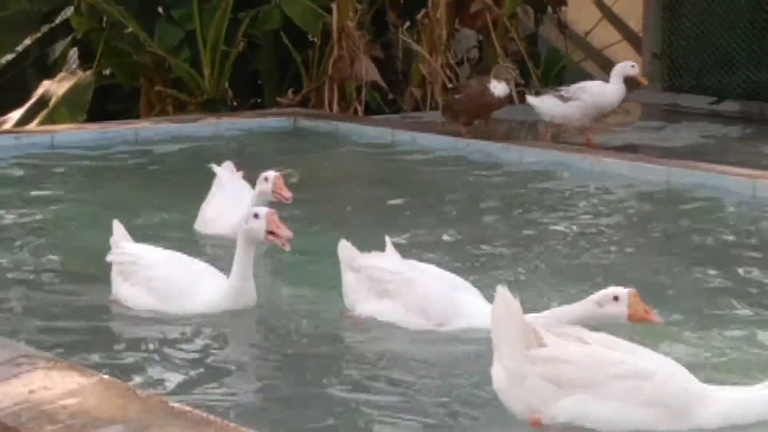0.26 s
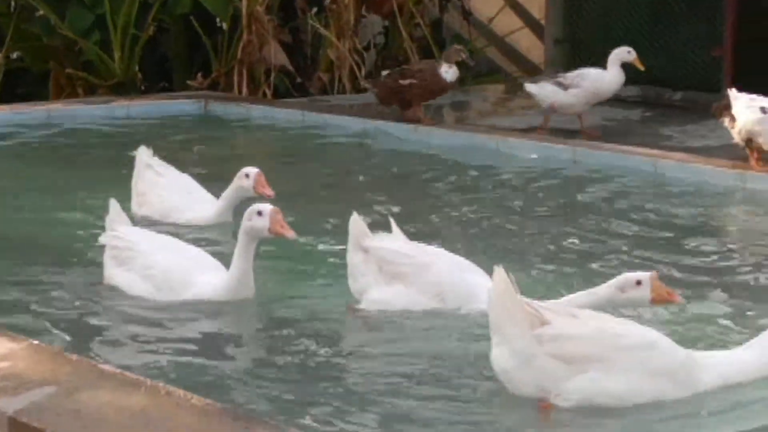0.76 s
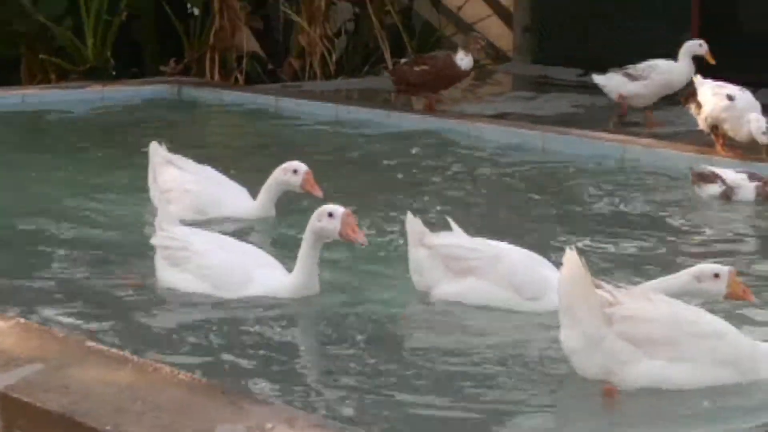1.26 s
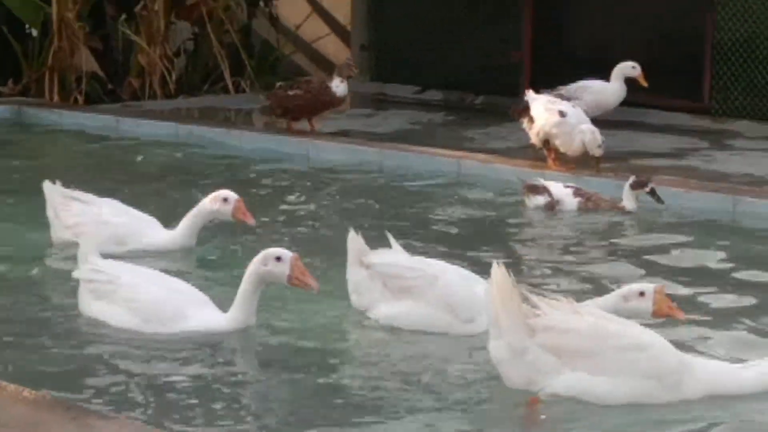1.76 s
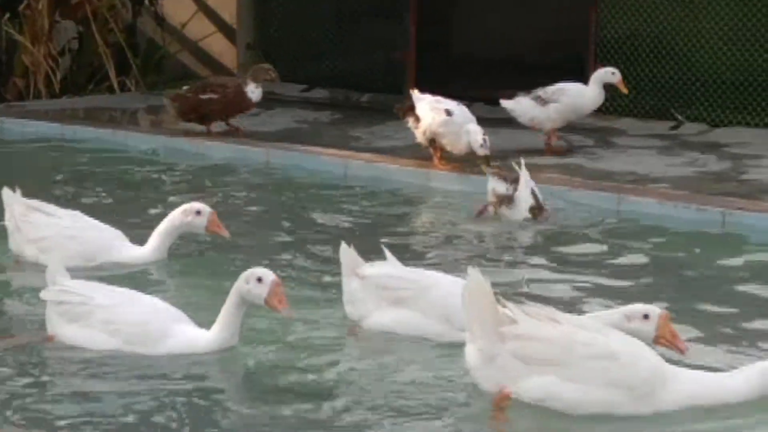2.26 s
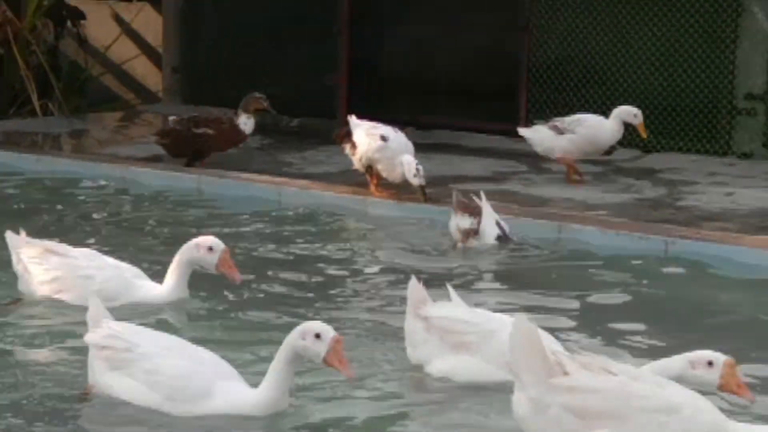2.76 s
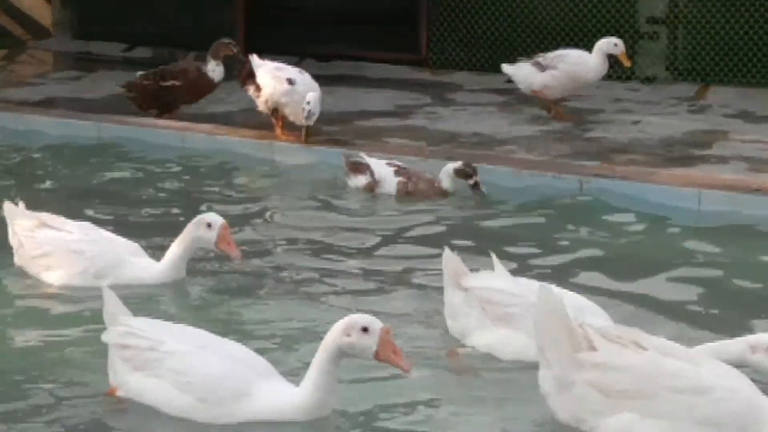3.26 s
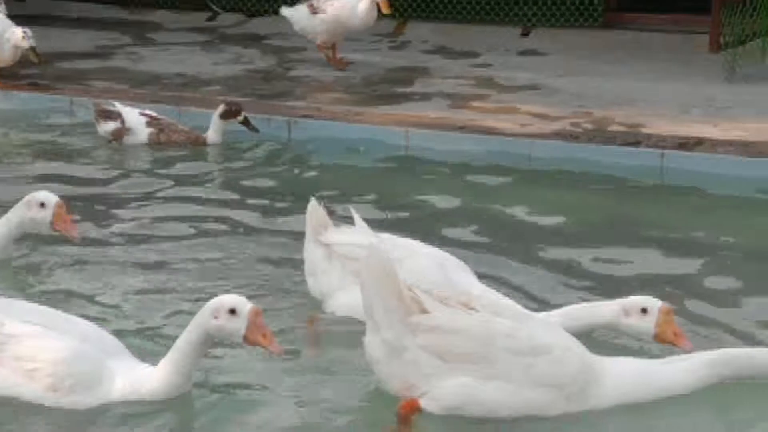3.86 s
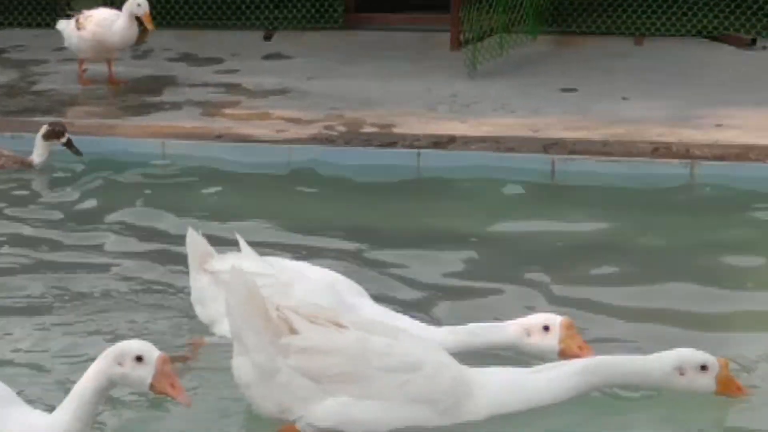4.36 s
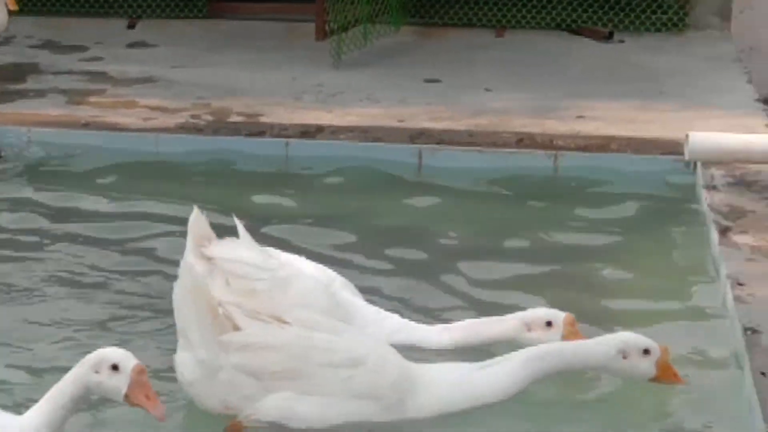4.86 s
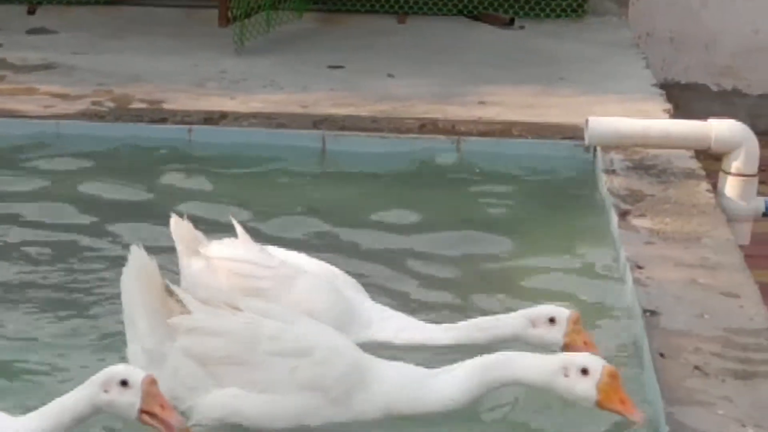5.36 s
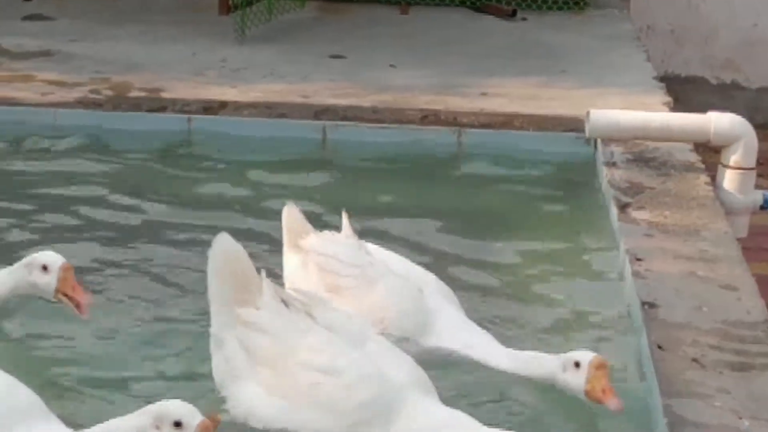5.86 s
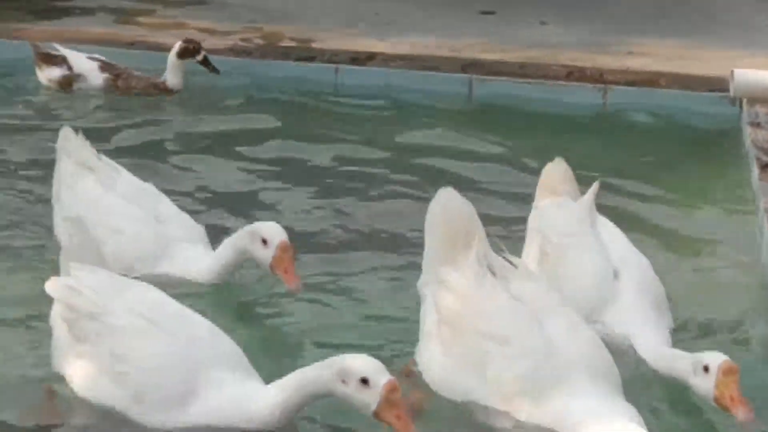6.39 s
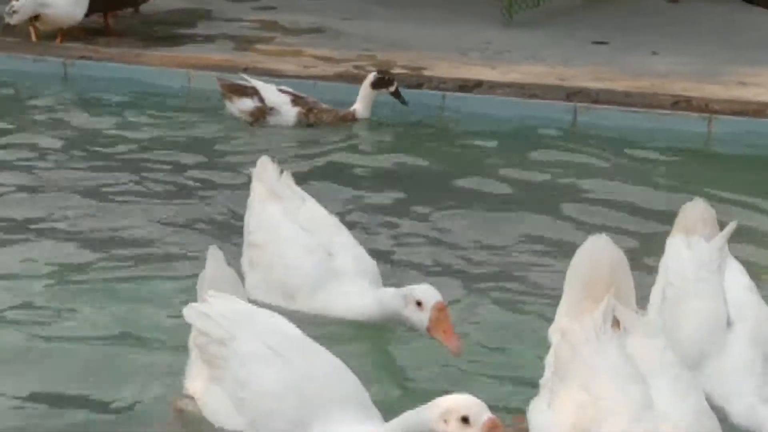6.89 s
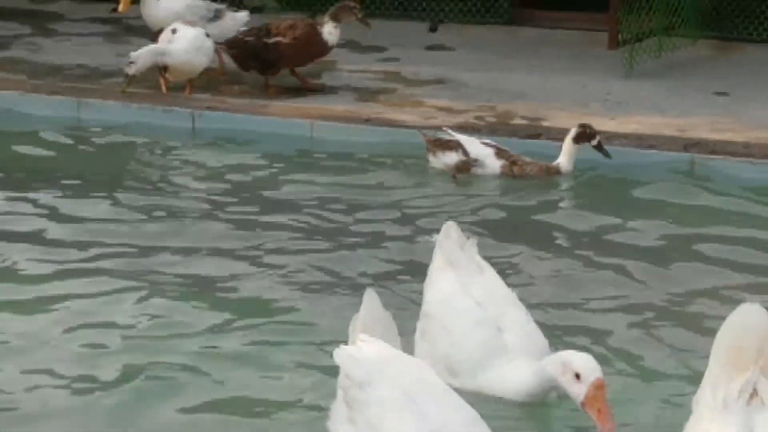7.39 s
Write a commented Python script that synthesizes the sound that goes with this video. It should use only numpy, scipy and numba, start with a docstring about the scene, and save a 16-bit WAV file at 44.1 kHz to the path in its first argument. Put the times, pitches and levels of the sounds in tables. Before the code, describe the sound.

Geese honk close by on an outdoor pond, their voices nasal and raspy, with a short echo from the enclosure's walls. Three quick honks open in the first half second, followed by a faint squeal and a few water drips until about 1.1 seconds. Farther birds give low buzzy brays around 1 and 2.3 seconds, with near honks between them. A small splash comes at 2.7 seconds, then more scattered honks. From about 4.2 to 6.2 seconds, honks, brays and high squeals overlap in a dense chorus, loudest near the end, where it slightly overloads the microphone. Two strong separate honks follow at about 6.7 and 7.2 seconds, and a harsh bray closes around 7.5. Underneath, a distant engine putters with a low rumble, speeding up and slowing down, along with faint wind and soft ripples.

```python
"""White geese honk close by on a pond, the loudest calls overloading the microphone.
Each honk is a buzz of slapping membranes, coloured by neck, throat and gaping bill. Birds farther
back bray, and some break into squeals. Water drips and splashes, and the enclosure's walls answer.
Outside, under a faint wind, a single-cylinder engine putters, speeding up and slowing down."""
import sys
import numpy as np
from scipy import signal
from scipy.fft import rfft, irfft, next_fast_len
from scipy.io import wavfile
from scipy.ndimage import uniform_filter1d, map_coordinates
from numba import njit

SR = 44100
rng = np.random.default_rng(int(sys.argv[2]) if len(sys.argv) > 2 else 0)


def to_wav(s):
    """Save 16-bit WAV."""
    ch = np.atleast_2d(s).T  # columns
    pcm = np.round(np.clip(ch, -1, 1) * 32767)  # PCM
    wavfile.write(sys.argv[1], SR, pcm.astype(np.int16))


N = 336483
TIME = np.arange(N) / SR


def amp(db):
    """Decibels to gain."""
    return 10 ** (np.asarray(db) / 20)


def unit(x):
    """x scaled to rms 1."""
    return x / np.sqrt(np.mean(x ** 2) + 1e-20)


def steady(x, size=700):
    """A leveller: holds x at rms 1 over a few pitch cycles."""
    power = uniform_filter1d(uniform_filter1d(x ** 2, size), size)
    return x / np.sqrt(np.abs(power) + 1e-12)


def along(points, hz):
    """Reads (f/Hz, value) points on a log frequency axis."""
    f, values = np.transpose(points)
    return np.interp(np.log(hz + 1), np.log(f + 1), values)


def curves(rows):
    """An automation curve for each column after t/s."""
    times, *columns = np.transpose(rows)
    return [np.interp(TIME, times, column) for column in columns]


def wobble(rate):
    """A smooth random curve, rate knots a second."""
    return map_coordinates(rng.standard_normal(int(N * rate / SR) + 4), [TIME * rate])


def colour(x, points, size=8192):
    """A minimum-phase EQ through (f/Hz, level/dB) points."""
    cepstrum = irfft(np.log(amp(along(points, np.fft.rfftfreq(size, 1 / SR)))))
    cepstrum[1:size // 2] *= 2
    cepstrum[size // 2 + 1:] = 0
    response = irfft(np.exp(rfft(cepstrum)))[:size // 2]
    return signal.oaconvolve(x, response)[:N]


@njit
def resonate(x, hz, width_hz):
    """A sweepable resonance with a peak gain of about 1."""
    out, state, keep = np.zeros(len(x)), 0j, np.exp(-np.pi * width_hz / SR)
    for i in range(len(x)):
        state = state * keep * np.exp(2j * np.pi * hz[i] / SR) + x[i]
        out[i] = 2 * (1 - keep) * state.real
    return out


def delayed(x, delay_s):
    """x through a delay that may move."""
    return map_coordinates(x, [np.arange(N) - delay_s * SR], order=3)


def pulses(rate, jitter, scatter_db):
    """One click per cycle, uneven in time (jitter, in cycles) and in size."""
    cycles = np.cumsum(rate) / SR
    at = np.interp(np.arange(1, int(cycles[-1])), cycles, np.arange(N))
    chance = rng.standard_normal((len(at), 2))
    at = at + chance[:, 0] * (jitter * SR / rate)[at.astype(int)]
    taps = at.astype(int)[:, None] + np.arange(-7, 9)
    offset = taps - at[:, None]  # a windowed sinc places each click between samples
    clicks = np.sinc(offset) * np.sinc(offset / 8) * amp(scatter_db * chance[:, 1:])
    return np.bincount(np.clip(taps, 0, N - 1).ravel(), clicks.ravel(), N)


def strikes(rows):
    """One impulse per (t/s, level/dB) row."""
    times, db = np.transpose(rows)
    return np.bincount((times * SR).astype(int), amp(db), N)


def puffs(clicks, life_s):
    """A dying burst of noise after each click, carrying the click's energy."""
    keep = np.exp(-1 / (life_s * SR))
    return np.sqrt(signal.lfilter([1 - keep], [1, -keep], clicks ** 2)) * rng.standard_normal(N)


def air():
    """A faint outdoor bed of wind and leaves."""
    murmur_eq = [(25, -11), (70, -11), (200, -9.5), (450, 1), (800, 1), (2000, -11.5), (3200, -7),
                 (4500, -59), (16000, -39)]  # f/Hz, level/dB
    return amp(-51 + 1.5 * wobble(3)) * unit(colour(rng.standard_normal(N), murmur_eq))


def yard(x):
    """The enclosure's diffuse reverb, in which the treble dies first."""
    decay_times = [(200, 0.38), (1300, 0.37), (3500, 0.37), (7000, 0.23), (15000, 0.18)]  # f/Hz, t60/s
    hz, t, noise = signal.stft(rng.standard_normal(SR), SR, nperseg=256)
    decay = amp(-60 * t / along(decay_times, hz)[:, None])
    tail = signal.istft(noise * decay, SR, nperseg=256)[1]
    tail *= np.clip(np.arange(len(tail)) / SR / .033, 0, 1)  # builds over 33 ms
    return signal.oaconvolve(x, tail / np.linalg.norm(tail))[:N]


def walls(x):
    """The pond's rim and the nearest walls return copies whose paths drift as the birds swim."""
    early_echoes = [(.0031, -9.5), (.0083, -9), (0.0157, -10), (0.0214, -14.5)]  # delay/s, level/dB
    return sum(amp(db) * delayed(x, delay_s + .0002 * wobble(2)) for delay_s, db in early_echoes)


def engine():
    """Each firing thumps the exhaust pipe; only the bass carries this far."""
    # the engine's changing pace: t/s, firing rate/Hz, level/dB, exhaust boom/Hz
    revs = [(0, 20, -49, 157), (.5, 21.5, -41.5, 150), (.9, 15.6, -45, 145), (1.6, 20.4, -39, 147),
            (2.35, 22, -43, 165), (2.8, 25.8, -40, 163), (3.35, 23.6, -37.5, 148), (3.95, 16, -45, 169),
            (4.35, 18.9, -39.5, 172), (5.1, 20, -38.5, 188), (5.9, 22.7, -38.5, 180.6),
            (6.27, 31, -38.5, 179), (6.55, 33.2, -40, 173), (6.8, 27.6, -42.5, 151),
            (6.98, 26.5, -36.5, 112), (7.35, 18.8, -47, 115), (7.63, 18.4, -44, 127)]
    distance_eq = [(30, -11.5), (80, 2.5), (180, -3.5), (330, 0), (600, -9.5), (1500, -18)]
    rate, db, boom_hz = curves(revs)
    firings = pulses(rate, jitter=.012, scatter_db=1.5)
    blasts = firings + .3 * puffs(firings, life_s=.006)
    thumps = resonate(resonate(blasts, boom_hz, width_hz=68.), boom_hz, width_hz=240.)
    return amp(db) * unit(colour(thumps, distance_eq))


def water():
    """Drops tick on the surface, a bird slaps up spray, and ripples fizz along the edge."""
    # drop hits, the slap and the swell of the ripples: t/s, relative level/dB
    drops = [(0.7084, -26), (0.7397, -32), (0.782, -36), (0.8837, -39), (0.9157, -35.5), (1.0189, -25),
             (1.0929, -34), (6.3907, -41)]
    slaps = [(2.714, -10.5)]
    lapping = [(0, -59.5), (.8, -72.5), (2.6, -63.5), (2.8, -61), (3.6, -59), (4.05, -71.5), (5.1, -59.5),
               (6.4, -74), (7.63, -53)]
    # tone of the spray: f/Hz, level/dB
    spray_eq = [(880, -41), (1500, -14.5), (1710, -21), (1920, 0), (2340, -2.5), (6060, -7.5), (9280, 1.5),
                (16000, -24)]
    drip_eq = [(200, -60), (1500, -21), (4000, -7.5), (8000, -.5), (16000, -10)]
    ripple_eq = [(60, -67.5), (600, -9.5), (2500, -2), (6000, -15.5), (16000, -22)]
    drips = colour(puffs(strikes(drops), life_s=.00083), drip_eq)
    splash = colour(puffs(strikes(slaps), life_s=.0048), spray_eq)
    ripples = unit(colour(rng.standard_normal(N), ripple_eq))
    ripple_db = curves(lapping)[0] + 14.5 + .67 * wobble(23)
    return amp(17) * drips + amp(21) * splash + amp(ripple_db) * ripples


def arch(start, swell_s, release_s, open_db, peak_db, open_hz, top_hz,
         fade_s, swell_bend, pitch_bend, release_db, sag):
    """A call's samples, gain and pitch: they glide with the push of air and sink as it runs out."""
    end = start + swell_s + release_s
    gate = np.clip(np.minimum(TIME - start, end - TIME) / fade_s + 1, 0, 1) ** 2
    on = gate > 0
    rise = np.clip((TIME[on] - start) / swell_s, 0, 1)
    fall = np.clip((TIME[on] - start - swell_s) / release_s, 0, 1) ** 2
    db = open_db + (peak_db - open_db) * rise ** swell_bend - release_db * fall
    pitch = (top_hz - (top_hz - open_hz) * (1 - rise) ** pitch_bend) * (1 - sag * fall)
    return on, gate[on] * amp(db), pitch


def syrinx(pitch, rough, jitter, scatter_db):
    """Membranes slap shut once a cycle; a rough voice is uneven and lets turbulent air through."""
    clicks = pulses(pitch, jitter * rough, scatter_db)
    return clicks, np.sqrt(1 - rough ** 2) * clicks + rough * puffs(clicks, life_s=.002)


def windpipe(x, spacing_hz, reflection, spread_s=.008, knee_hz=2564):
    """Sound runs up and down the flexing neck, giving evenly spaced resonances that drift."""
    size = next_fast_len(N + 4096)
    hz = np.fft.rfftfreq(size, 1 / SR)
    chirp = np.exp(-2j * np.pi * spread_s * knee_hz * np.log1p(hz / knee_hz))
    x = irfft(rfft(x, size) * chirp, size)[:N]  # each pulse becomes a short downward chirp
    round_trip = (1 + .061 * wobble(7)) / spacing_hz  # the neck stretches and bends
    return x + reflection * delayed(x + reflection * delayed(x, round_trip), round_trip)


def ripple_glint(x):
    """The rocking water mirrors a swimming bird, so notches wander through its voice."""
    return x + .55 * delayed(x, .0011 + .00022 * wobble(5))


def squeals():
    """The voice breaks into a high register; fast unevenness of the cycles frays the overtones."""
    # squeals: t/s, swell/s, release/s, opening level/dB, peak level/dB, opening pitch/Hz,
    # top pitch/Hz, roughness/0-1, lift of harmonics 2 and 3/dB
    calls = [ (.57, 0.0708, .17, -46, -34, 842, 832, 0.29, 5.5),
             (4.25, .12, 0.086, -25.5, -24, 944, 1039, .6, 2.5),
             (5.082, .05, .075, -21, -19, 1135, 1118, .12, 1), (5.2, .07, .15, -19, -16, 1090, 1170, .3, 3),
             (5.27, 0.036, .15, -23, -19.5, 978.6, 948.4, 0.56, 3.5),
             (5.645, 0.016, 0.013, -24.5, -20.5, 1300, 1335, .5, 23),
             (6.05, .032, .008, -21.5, -13, 1120, 1155, 0.54, 11.5)]
    # their timbre: harmonic number, level/dB
    harmonics = [(1, 6.5), (2, -5), (3, -12), (4, -16), (5, -24), (6, -19), (7, -25), (8, -22)]
    hiss_eq = [(1000, -44), (5000, -14), (9000, -1.5), (16000, -5)]
    out = np.zeros(N)
    waver, fray, flutter = 1 + .005 * wobble(90), wobble(700), wobble(400)
    hiss = unit(colour(rng.standard_normal(N), hiss_eq))  # air forced through the bill
    for *call, rough, lift_db in calls:
        on, gain, pitch = arch(*call, fade_s=.015, swell_bend=1.1, pitch_bend=1.4,
                               release_db=5, sag=.05)
        phase = 2 * np.pi * np.cumsum(pitch * waver[on]) / SR + .4 * rough * fray[on]
        tone = sum(amp(db + lift_db * (k in (2, 3))) * np.sin(k * phase) for k, db in harmonics)
        out[on] += (unit(tone) + amp(-32) * hiss[on]) * gain * amp(1.5 + 4.8 * rough * flutter[on])
    return out


def bray_controls(relax_db_per_s=31):
    """Each bray is a flat arch whose throat resonance stays in place and slowly relaxes."""
    # brays: t/s, swell/s, release/s, opening level/dB, peak level/dB, opening pitch/Hz, top pitch/Hz,
    # throat resonance/Hz, its opening strength/dB, roughness/0-1, bright edge/dB
    calls = [ (.99, 0.026, .05, -24.5, -23.5, 130, 148, 821, 5.5, 0.18, -15.5),
             (1.069, 0.17, .08, -30.5, -24, 153.1, 157.5, 1060, 14, 0.11, -11.5),
             (2.255, .135, .245, -25, -18, 120, 143.1, 1657, 20, .1, -13.5),
             (3.42, 0.065, 0.29, -23, -19.5, 153, 151.4, 937, -0.5, 0.32, -11),
             (4.24, .1, .11, -17.5, -21.5, 156.4, 170.2, 2030, 17, 0.36, -19),
             (5.226, .05, .15, -24.5, -20, 190.3, 191.9, 2067, 18, .25, -2.5),
             (6.04, 0.043, 0.029, -23, -18, 185.9, 182.6, 1130, 17.5, 0.32, -19),
             (6.133, .004, .008, -13, -9, 176, 174, 1230, 8, .28, -5),
             (7.368, 0.25, 0.14, -19.5, -15, 135.7, 148.4, 943, 2.5, 0.22, -1.5)]
    pitch, throat_hz = np.full(N, 150.), np.full(N, 1000.)
    nasal, rough, voice, edge = np.zeros((4, N))
    for *call, rest_hz, nasal_db, roughness, edge_db in calls:
        on, gain, call_pitch = arch(*call, fade_s=.008, swell_bend=1.3, pitch_bend=1.3,
                                    release_db=7, sag=.06)
        pitch[on], throat_hz[on], rough[on] = call_pitch, rest_hz, roughness
        voice[on], edge[on] = gain, gain * amp(edge_db)
        nasal[on] = amp(nasal_db - relax_db_per_s * (TIME[on] - call[0]))
    return pitch, throat_hz, nasal, rough, voice, edge


def far_geese():
    """Brays: a low, flat buzz through a broad throat resonance."""
    # tone of the throat and of the bright edge: f/Hz, level/dB
    throat_eq = [(30, -80), (140, -32.5), (300, -37), (440, -32), (570, -3.5), (850, 6), (1200, 1),
                 (1600, 0), (2050, 3.5), (2400, -40), (3200, -61), (5000, -41)]
    edge_eq = [(300, -49.5), (1800, 14), (2600, 4), (3300, 0.5), (3800, -16), (4300, -4.5), (5000, -14),
               (5800, -13.5), (9000, -22), (15000, -46.5)]
    pitch, throat_hz, nasal, rough, voice, edge = bray_controls()
    _, source = syrinx(pitch * (1 + .009 * wobble(40)), rough, jitter=.09, scatter_db=1.4)
    buzz = windpipe(source, spacing_hz=283.4, reflection=.56)
    throat = colour(buzz, throat_eq)
    body = steady(throat + nasal * resonate(throat, throat_hz, width_hz=150.))
    bright = steady(colour(ripple_glint(buzz), edge_eq))
    return amp(-3.5) * voice * body + amp(-2.5) * edge * bright


def honk_controls():
    """Each honk is clearest and most nasal at its peak; then the bill gapes and lets out more treble."""
    # honks: t/s, swell/s, release/s, opening level/dB, peak level/dB, opening pitch/Hz, top pitch/Hz,
    # throat resonance/Hz, its rise as the bill gapes/Hz, its base strength/dB, roughness/0-1,
    # bill ring/dB, rasp/dB
    calls = [ (.073, 0.093, 0.016, -12.5, -10.5, 131.8, 175.3, 1310, 222, 17, 0.21, -16.5, -14),
             (.224, 0.13, 0.035, -18, -4.5, 143.1, 206.9, 1196, 527, 12, 0.23, -11.5, -16),
             (0.469, 0.074, 0.03, -12, -9, 149.4, 204, 1292, 267, 18, 0.01, -18, -17),
             (1.362, 0.063, 0.13, -21.5, -20, 117.5, 161.9, 1334, 61, -8.5, 0.33, -16.5, -18),
             (1.53, 0.11, 0.051, -18, -10, 155.8, 194, 1308, 43, 16, 0.21, -16, -26.5),
             (1.784, .095, 0.078, -24, -17.5, 123, 155.5, 1365, 50, -1.5, 0.44, -21.5, -23),
             (1.956, .11, 0.082, -17, -16, 153, 182.7, 1317, 2, 10, 0.31, -19, -29),
             (2.817, 0.14, 0.098, -24.5, -16, 122.7, 150.4, 1352, 49.5, -3.5, 0.47, -21, -19),
             (3.187, 0.12, 0.051, -20.5, -16, 149, 177.5, 879.4, 20, -10, 0.24, -23.5, -19),
             (3.336, 0.024, .12, -14, -16, 133.6, 148.1, 921.3, 355, -9.5, 0.32, -23.5, -20),
             (3.779, 0.12, 0.038, -17, -10.5, 147.1, 188.9, 1274, 70, 6.5, 0.27, -19.5, -17),
             (4.136, 0.072, 0.082, -17.5, -16, 122.7, 159.6, 903, 56, -13.5, 0.25, -20, -16),
             (4.47, 0.12, 0.015, -16, -7.5, 123.9, 188, 1276, 13, 6, 0.21, -25, -23.5),
             (4.605, 0.021, .05, -13, -9, 168.6, 184.6, 1305, 26, 7, 0.29, -18.5, -18.5),
             (4.676, .045, 0.052, -10, -14.5, 171, 180.2, 1326, 18, 1.5, .32, -22.5, -23.5),
             (4.841, .098, .085, -15, -8, 151.1, 187.8, 1292, 14, 8.5, 0.24, -22, -27.5),
             (5.35, 0.079, 0.11, -14.5, -13, 127.6, 160.9, 1356, 37.4, 0.5, 0.37, -15.5, -18),
             (5.522, 0.1, 0.053, -13.5, -4.5, 161.7, 198.2, 1325, 70, 12, 0.14, -19, -20),
             (5.742, 0.086, 0.042, -9.5, -4, 159.1, 215.3, 1497, 378, 14, 0.11, -10.5, -14),
             (5.943, 0.077, 0.028, -5, -7, 165.6, 181.5, 1294, 230, 13, 0.37, -15.5, -16.5),
             (6.589, 0.19, 0.052, -17.5, -5, 117, 194.3, 1312, 60, 12, 0.25, -20, -14.5),
             (7.018, 0.19, 0.083, -20.5, -5.5, 137.6, 187.4, 1284, 10, 15, 0.3, -17.5, -20.5)]
    crest_width_s, gape_lag_s, gape_width_s = .05, .016, .041
    pitch, throat_hz = np.full(N, 160.), np.full(N, 1300.)
    nasal, rough, voice, ring, rasp = np.zeros((5, N))
    for *call, rest_hz, flare_hz, nasal_db, roughness, ring_db, rasp_db in calls:
        on, gain, call_pitch = arch(*call, fade_s=.009, swell_bend=1.06, pitch_bend=1.7,
                                    release_db=8, sag=.1)
        start, swell_s = call[:2]
        past_peak = np.maximum(TIME[on] - start, 0) - swell_s
        crest = np.exp(-(past_peak / crest_width_s) ** 2)
        gape = np.exp(-((past_peak - gape_lag_s) / gape_width_s) ** 2)
        pitch[on], throat_hz[on] = call_pitch, rest_hz + flare_hz * gape
        nasal[on] = amp(nasal_db + 16 * crest)
        rough[on] = roughness * (1 - .23 * crest)
        voice[on] = np.maximum(voice[on], gain)  # one honk may run into the next
        ring[on] = voice[on] * amp(ring_db + 5.5 * gape)
        rasp[on] = voice[on] * amp(rasp_db + 3 * gape)
    return pitch, throat_hz, nasal, rough, voice, ring, rasp


def near_geese():
    """Honks: pulses ring one sharp throat resonance and the bill; each slap adds a bright crack."""
    # tone of the throat, the ringing bill and the rasp: f/Hz, level/dB
    throat_eq = [(25, -79), (70, -44.5), (175, 4), (260, -8), (360, -16), (450, -22), (600, -4), (760, 5.5),
                 (970, 3.5), (1300, 0), (1700, -1), (2100, -2.5), (2450, -17.5), (3200, -50)]
    bill_eq = [(300, -74.5), (1600, -11), (2300, -1.5), (2650, 1.5), (3050, -4.5), (3350, 0.5), (3700, -4),
               (4100, -3), (4700, -17.5), (6000, -28)]
    rasp_eq = [(300, -81), (3300, -27), (4400, 1), (5000, 4.5), (5500, 4.5), (6100, 4), (7200, 0),
               (8000, -1.5), (9000, -2), (10500, -11), (13000, -11), (16000, -19.5)]
    neck = dict(spacing_hz=434.7, reflection=.45)
    pitch, throat_hz, nasal, rough, voice, ring, rasp = honk_controls()
    clicks, source = syrinx(pitch * (1 + .011 * wobble(45)), rough, jitter=.07, scatter_db=1.5)
    buzz = windpipe(source, **neck)
    throat = colour(buzz, throat_eq)
    body = steady(throat + nasal * resonate(throat, throat_hz, width_hz=85.))
    bill = steady(colour(ripple_glint(buzz), bill_eq))
    slaps = windpipe(clicks + 1.2 * puffs(clicks, life_s=.00012), **neck)
    crack = steady(colour(ripple_glint(slaps), rasp_eq))
    effort = np.clip(voice / amp(-7.5), 0, 1)
    body_gain = voice * amp(3.05 * effort ** 2 - 3.5)  # loud honks gain extra body
    crack_gain = rasp * amp(-3.5 + 3.84 * wobble(70))  # the treble flickers
    return body_gain * body + amp(-3) * ring * bill + crack_gain * crack


def scene():
    """Geese and water get early echoes; the geese and, more strongly, the engine feed the reverb."""
    geese = near_geese() + far_geese() + squeals()
    putter = engine()
    pond = geese + water()
    reverb = yard(amp(-11.5) * geese + amp(-8) * putter)
    return (pond + walls(pond) + reverb + amp(-3.5) * putter + air())[None]


def record(dry):
    """The overloaded microphone flattens the loudest peaks; the extreme treble is cut off."""
    ceiling, top_hz = 1.02, 16000
    clipped = dry / (1 + np.abs(dry / ceiling) ** 8) ** (1 / 8)
    size = next_fast_len(N + 4096)
    passband = np.fft.rfftfreq(size, 1 / SR) < top_hz
    return irfft(rfft(clipped, size) * passband, size)[..., :N]


dry = scene()
out = record(dry)
to_wav(out)
```